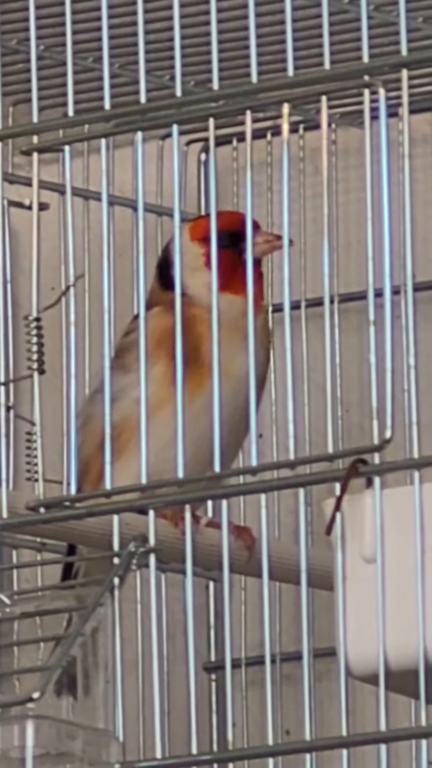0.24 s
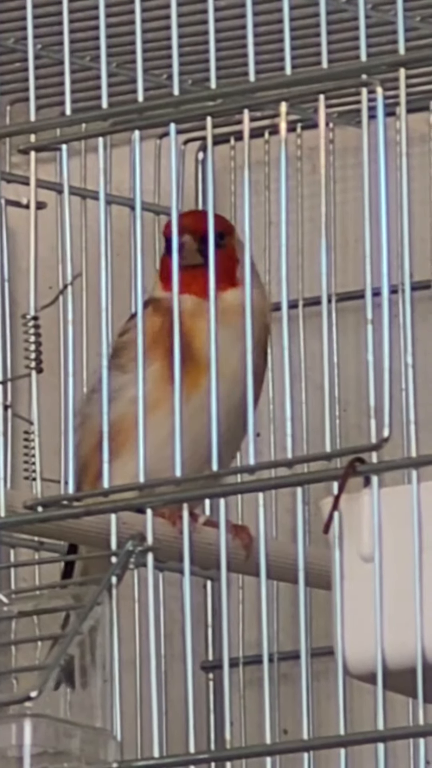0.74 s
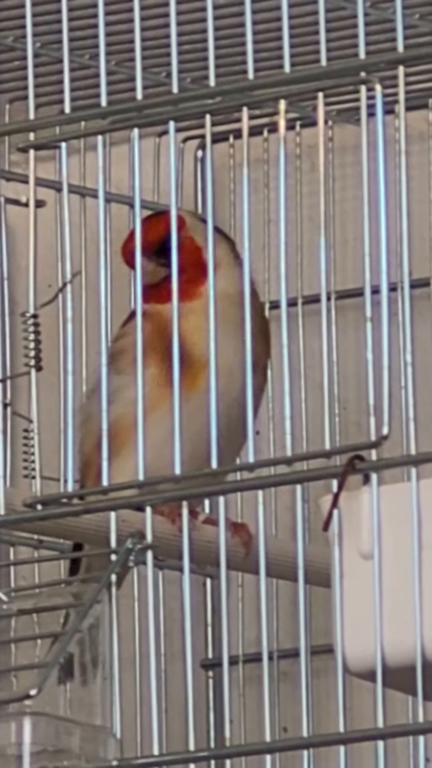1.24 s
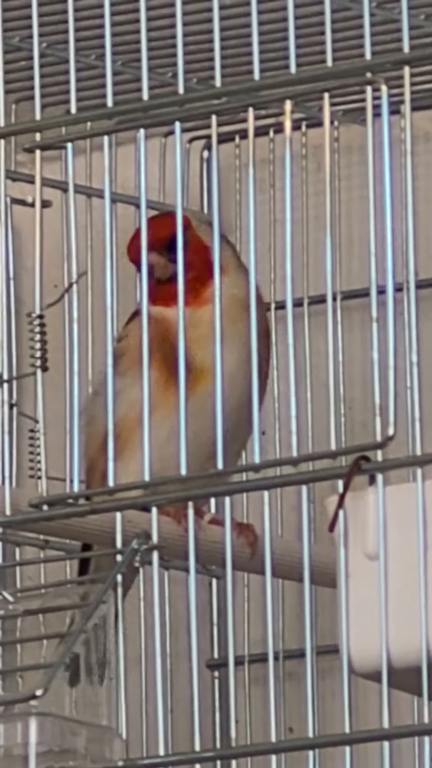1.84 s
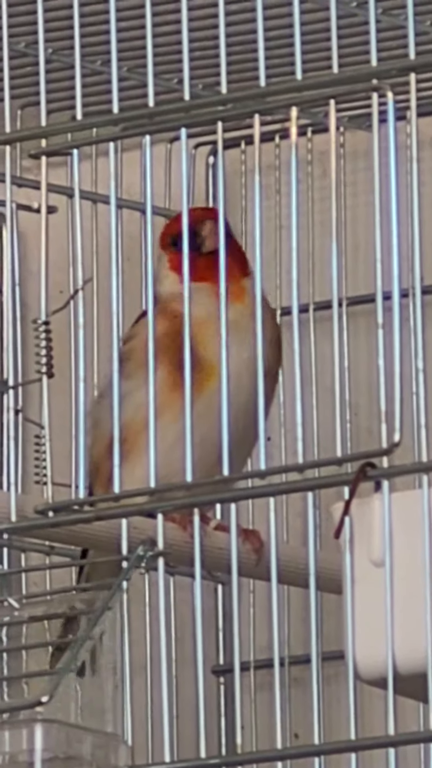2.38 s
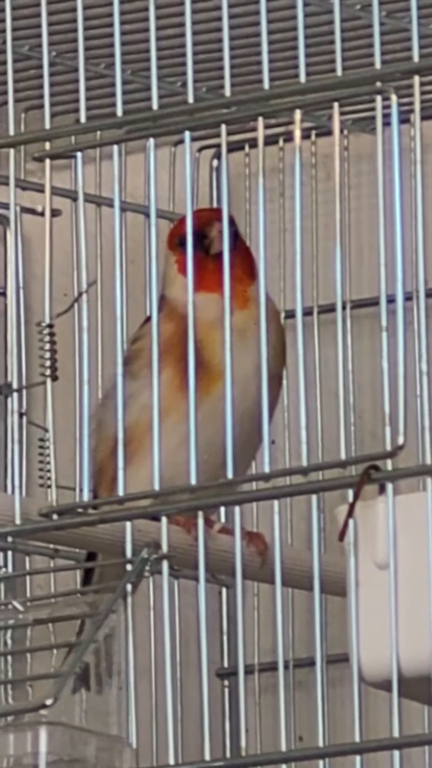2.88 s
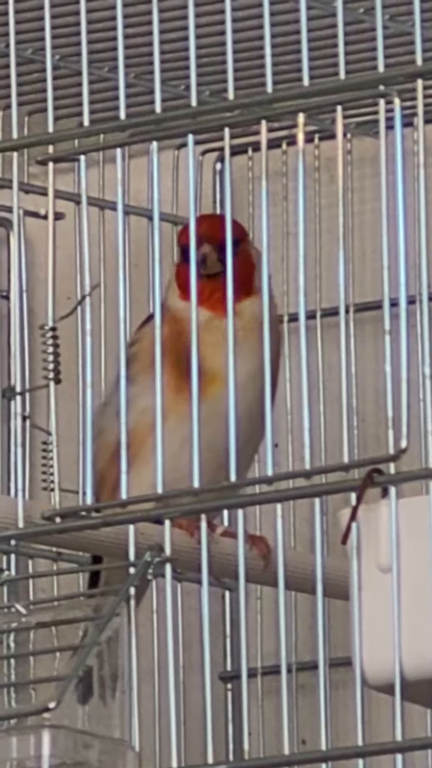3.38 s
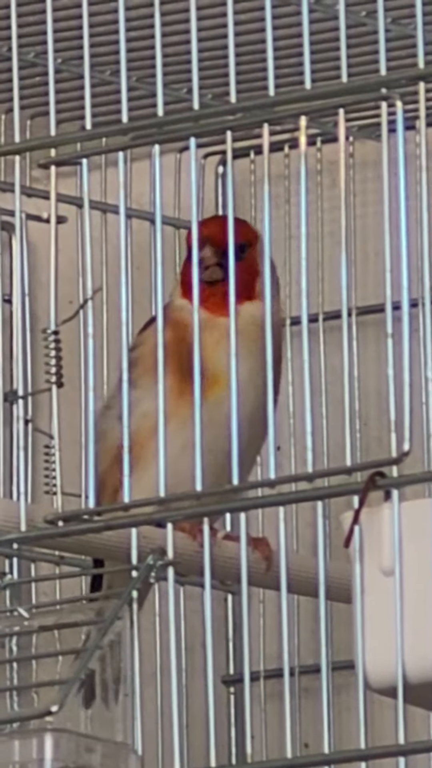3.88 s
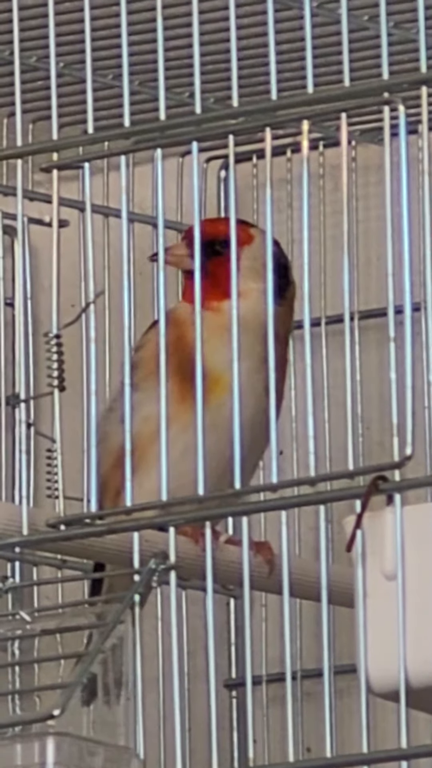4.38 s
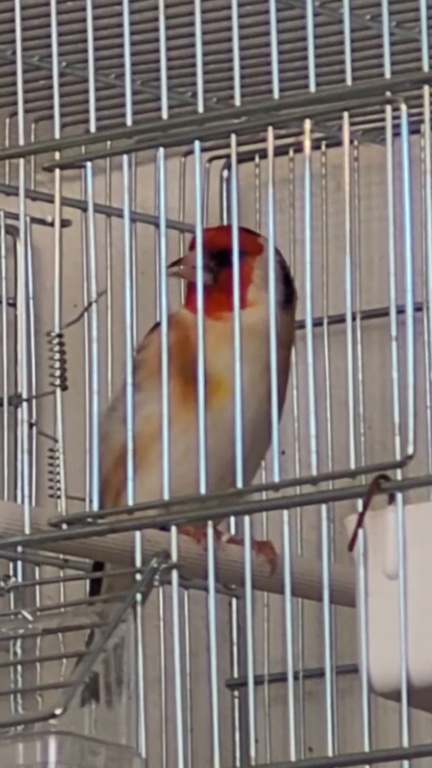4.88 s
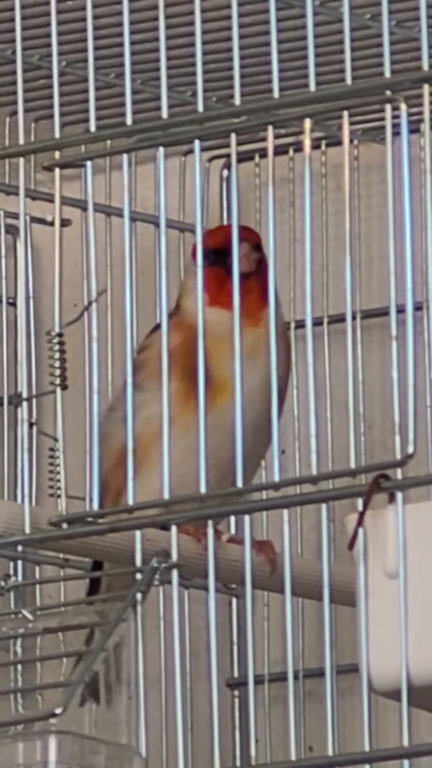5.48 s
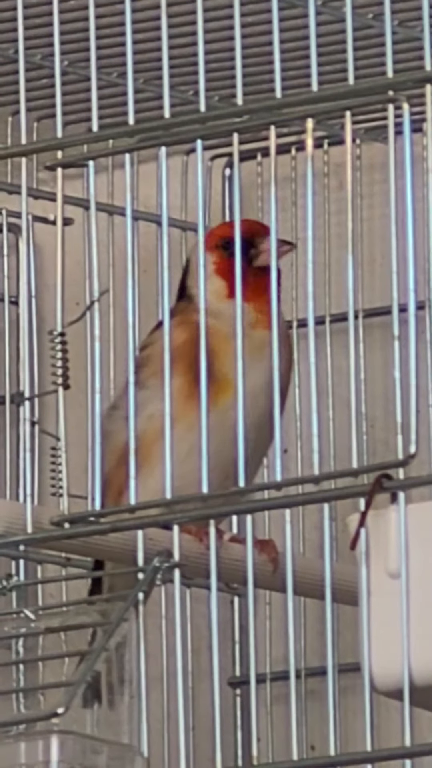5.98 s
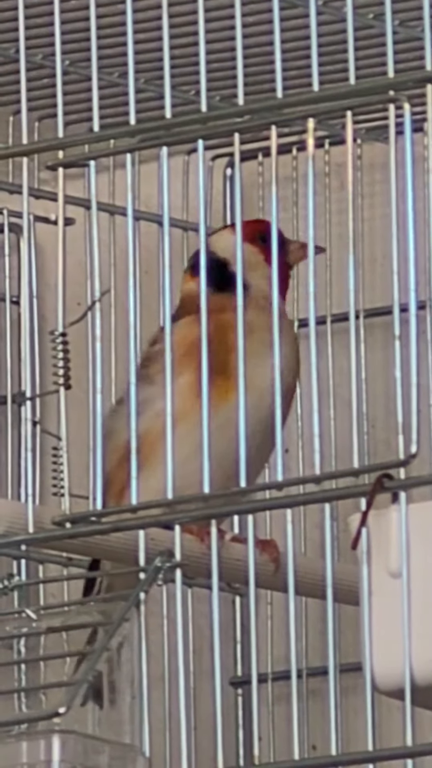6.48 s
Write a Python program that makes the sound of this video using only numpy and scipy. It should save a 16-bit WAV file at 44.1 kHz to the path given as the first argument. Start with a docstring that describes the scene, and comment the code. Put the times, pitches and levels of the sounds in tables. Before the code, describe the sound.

A caged finch sings in a small, reflective room, heard from a short distance by a phone, slightly to the right. A harsh falling buzz opens at 0 s, then a fast ticking run from 0.2 to 0.45 and a few thin chirps. A near-pause around 0.7-1.0 holds soft dull rustles and bumps. From 1.05 to 2.1 come nasal slurs gliding up and down, quick pips and chups, with faint farther twitter. Low upward notes repeat at 2.45-2.85, then a sharp peep and an accelerating bell-like trill to about 3.45, with a downward slur inside. Five rising whits follow at 3.5-3.9, clicks and a dense buzz at 4.0-4.35, then loud descending whistles at 4.5-5.1. A falling slur at 5.3 leads to tumbling chirps at 5.65-6.3, a bright whistle at 6.0, and last upward flicks and a tiny buzz near 6.7. Quiet uneven rumble sinks in the gaps.

```python
"""Finches in a hard-walled room

Caged finches twitter in a small room, some way from a phone, over soft farther chatter, rustles, thumps and rumble.
Whistles, trills and slurs are fluttering sines with overtones and breath; buzzes are fast falling chirps.
Rustles are decaying noise puffs and the rumble is coloured noise in uneven patches.
Decaying noise echoes smear the birds and rustles, and a noise suppressor turns faint sound down.
"""
import sys
import numpy as np
from scipy import signal
from scipy.fft import rfft, irfft, next_fast_len
from scipy.io import wavfile
from scipy.ndimage import uniform_filter1d

SR = 44100
rng = np.random.default_rng(int(sys.argv[2]) if len(sys.argv) > 2 else 0)


def put_to_file(sound):
    """Save the sound as 16-bit audio at rate SR, in the file named by the first command-line argument."""
    columns = np.atleast_2d(sound).T  # one column per channel
    safe = np.clip(columns, -1, 1)
    whole_steps = np.round(safe * 32767)
    wavfile.write(sys.argv[1], SR, whole_steps.astype(np.int16))


N = 296781

# All levels are relative: the filters and gains further on change them.
# Room rumble spectrum: (frequency [Hz], density [dB])
RUMBLE_SPECTRUM = [(20, -47), (60, 6.5), (110, -6.5), (160, -0.5), (300, -4.5), (760, -14), (2100, -18),
                   (15000, -24)]
# Likeness of the rumble at the two ports: (frequency [Hz], correlation [0 to 1])
PORT_LIKENESS = [(150, 0.94), (380, 0.62), (950, 0.17)]
# Feather and perch puffs: (time [s], level [dB], hiss against body [dB])
RUSTLES = [(0.49, -45.5, -10.5), (0.796, -35.5, -14.5), (0.894, -33, -40), (1.31, -30, -22),
           (2.949, -40.5, -15), (3.588, -37, -35)]
# Soft twitter of farther birds: (start [s], end [s], level [dB])
CHATTER = [(1.079, 1.45, -33.5), (1.779, 2.138, -35)]
# Buzzes of falling chirps:
# (time [s], length [s], first top [Hz], last top [Hz], level [dB], mean rate [chirps/s], mean fall [octaves])
BUZZES = [(0.0, .12, 7400, 6800, -24, 58, 1.6), (4.198, .172, 5300, 4600, -26, 72, 1.05),
          (4.19, .17, 7500, 6700, -33, 72, .55), (6.667, .05, 4600, 4600, -37, 50, 1.3)]
# Long bent notes: (overtone strength [dB], level at MIDDLE_HZ [dB], swell [dB/octave],
# pitch points (time [s], pitch [Hz]))
SLURS = [(8, -34, 13.9, [(1.055, 1171), (1.13, 1730), (1.21, 2920), (1.29, 3140)]),
         (-3.5, -28.5, 18.5, [(1.38, 1725), (1.42, 2830), (1.49, 3458), (1.63, 3471), (1.79, 1774)]),
         (1, -33.5, 7.6, [(1.8, 1562), (1.92, 2902), (1.99, 3008), (2.045, 3575)]),
         (-22, -27, 13.4, [(3.072, 7700), (3.092, 5000), (3.15, 3136), (3.2, 2700), (3.385, 1658)]),
         (-14, -28, 14.3, [(5.266, 8000), (5.287, 4430), (5.36, 2836), (5.45, 2353), (5.53, 2540)]),
         (4.5, -41, 4, [(5.77, 2490), (5.83, 3072), (5.91, 3012)]), (-7, -29.5, 12, [(5.9, 3090),
         (5.95, 3508), (6.03, 3615)])]
# Level whistles: (time [s], length [s], pitch [Hz], level [dB])
HELD_NOTES = [(0.494, 0.023, 3636, -28.5), (1.087, 0.03, 7100, -40.5), (1.335, 0.035, 7230, -41),
              (1.405, 0.057, 5040, -25.5), (1.998, 0.043, 5270, -33), (2.024, 0.062, 7150, -29),
              (2.09, 0.04, 4950, -19.5), (2.327, 0.014, 3517, -28), (2.87, 0.022, 4746, -17.5),
              (4.015, 0.017, 6450, -17), (4.022, 0.014, 5610, -22), (4.154, 0.034, 3550, -34.5),
              (4.165, 0.02, 7240, -41), (4.581, 0.014, 3490, -28.5), (4.789, 0.029, 2926, -27.5),
              (5.033, 0.0068, 3804, -25.5), (5.112, 0.016, 2563, -38.5), (5.212, 0.037, 2270, -39),
              (5.236, 0.013, 3790, -29.5), (5.54, 0.0086, 3280, -31.5), (6.012, 0.066, 4600, -18.5),
              (6.034, 0.03, 5510, -20)]
# Sliding whistles: (time [s], length [s], start [Hz], end [Hz], level [dB])
GLIDES = [(0.341, 0.026, 4200, 5910, -30.5), (0.598, 0.023, 3970, 4990, -30.5),
          (0.619, 0.011, 5670, 6800, -38), (1.09, 0.066, 2764, 4650, -32), (1.283, 0.076, 2907, 3687, -23),
          (1.385, 0.03, 3703, 5136, -23.5), (1.776, 0.054, 3700, 4400, -27.5),
          (1.998, 0.023, 7850, 6280, -33), (2.068, 0.017, 3900, 5030, -26),
          (2.132, 0.028, 7660, 6160, -25.5), (2.729, 0.081, 2830, 3290, -40),
          (2.83, 0.065, 3570, 4350, -30), (2.917, 0.072, 1850, 3855, -26), (4.01, 0.029, 8270, 5500, -24.5),
          (4.636, 0.04, 3180, 4460, -22), (4.67, 0.073, 2597, 3595, -26.5), (5.696, 0.08, 2900, 4500, -27),
          (6.342, 0.031, 4310, 3230, -27.5), (6.377, 0.042, 3840, 6580, -24),
          (6.49, 0.019, 3350, 5680, -22)]
# Syllables by name, as strokes sung in a row: (length [s], start [Hz], pulled toward [Hz], end [Hz])
SYLLABLES = dict( tip=[(.02, 3920, 3420, 2175)], pip=[(0.029, 4560, 4970, 4810)],
             chup=[(0.024, 4100, 4144, 3227)], arch=[(.035, 5750, 6140, 5000)],
             hook=[(.008, 5900, 4850, 4370), (.022, 4197, 4235, 4400)], wup=[(.05, 1768, 2394, 2620)],
             bell=[(.034, 4787, 5080, 4880)], whit=[(.042, 3360, 6280, 7250)],
             swoop=[(.073, 6256, 6000, 3937)], flick=[(.008, 3300, 6750, 7600), (.012, 7710, 8220, 5900)],
             tumble=[(0.014, 7570, 4015, 4090), (.038, 4057, 3520, 1736)])
# Repeated syllables: (name, s: first time [s], count [repeats], gap: first gap [s],
# stretch: each gap over the last [ratio], db: level [dB])
TRILLS = [dict(name="tip", s=.195, count=6, gap=.0438, stretch=1, db=-24),
          dict(name="pip", s=1.143, count=5, gap=0.076, stretch=0.82, db=-29),
          dict(name="wup", s=2.44, count=4, gap=.135, stretch=.925, db=-26.5),
          dict(name="hook", s=2.663, count=3, gap=.064, stretch=1, db=-24),
          dict(name="bell", s=2.924, count=11, gap=0.06, stretch=0.95, db=-23.5)]
# Freely timed syllables by name: (time [s], level [dB])
FREE_SYLLABLES = dict( arch=[(.175, -39.5), (.285, -36.5), (1.6, -39), (2.535, -38), (5.48, -37)],
                  chup=[(1.838, -26), (1.925, -24.5), (1.995, -21.5), (2.068, -21)], whit=[(3.508, -23.5),
                  (3.592, -25.5), (3.68, -25), (3.791, -22.5), (3.882, -24.5)], swoop=[(4.51, -18.5),
                  (4.679, -18), (4.858, -16), (5.062, -21)], tumble=[(5.657, -26), (5.742, -23.5),
                  (5.825, -24), (5.924, -26.5), (6.009, -23), (6.095, -29.5), (6.174, -27.5),
                  (6.254, -25.5)])
# Overall tone colour of the birds: (frequency [Hz], gain [dB])
BIRD_COLOUR = [(1200, 2.5), (2500, 2.5), (5000, 4), (7500, 2.5), (8800, -1), (10800, 12), (15000, 9.5)]
# Decay of the wall echoes: (frequency [Hz], time to fall 60 dB [s], before the early part is boosted)
WALL_DECAY = [(1500, 0.17), (3000, 0.35), (5500, 0.29), (9000, 0.22)]

TOP_HZ = 16000  # band limit of the overtones and of the whole sound
CHATTER_PER_S, CHATTER_HZ, CHATTER_S = 59, (2945, 6270), (0.0078, 0.0247)  # notes/s, start pitch and length ranges
MIDDLE_HZ, LOUDEST_HZ = 3320, 4400  # a slur is strongest at LOUDEST_HZ and thins again above it
THROAT_HZ, THROAT_OCTAVES, THROAT_DB = 6000, .24, 14  # the open beak favours a slur's overtones near this pitch
FULL_HZ, FADE_DB_PER_OCTAVE = 3220, 12.5  # below FULL_HZ a whistle weakens as it sinks
HOOK = 0.046  # a slide is pulled toward a pitch beyond its end by this share of its span, so it moves early
FLICK_LEAD_S, FLICK_DB = .03, -9  # every swoop is led in by a softer flick
SWOOP_LATE = 2.66  # a swoop starts softly and peaks late


def amp(db):
    """Logarithmic level: the amplitude ratio of a level in dB."""
    return 10 ** (np.asarray(db) / 20)


def unit(x):
    """Normalisation: scales a signal to an rms of 1."""
    return x / np.sqrt(np.mean(x ** 2) + 1e-20)


def along(points, hz):
    """Log-frequency interpolation between (frequency [Hz], value) points."""
    f, v = np.transpose(points)
    return np.interp(np.log(hz + 1), np.log(f + 1), v)


def filtered(x, response):
    """Linear filtering: multiplies the spectrum by a response of frequency."""
    m = next_fast_len(N + 8192)
    hz = np.fft.rfftfreq(m, 1 / SR)
    return irfft(rfft(x, m) * response(hz), m)[..., :N]


def add(track, s, x):
    """Superposition: adds x to the track in place, from s seconds on."""
    part = track[round(s * SR):][:len(x)]
    part += x[:len(part)]


def room_tone():
    """Partly coherent noise: rumble in slow uneven patches, most alike at the two ports in the bass."""
    z = signal.stft(rng.standard_normal((2, N)), nperseg=2048)[2]
    patches = rng.standard_normal(z.shape[1:])
    patches = uniform_filter1d(patches, size=4, axis=0)
    patches = uniform_filter1d(patches, size=6, axis=1)
    patch_gain = amp(5.57 * unit(patches))
    pair = signal.istft(z * patch_gain, nperseg=2048)[1][:, :N]

    def mid_side_response(hz):
        angle = np.arccos(np.clip(along(PORT_LIKENESS, hz), 0, 1)) / 2  # splits power to give the likeness
        return amp(along(RUMBLE_SPECTRUM, hz)) * [np.cos(angle), np.sin(angle)]

    mid, side = filtered(pair, mid_side_response)
    ports = unit(np.array([mid + side, mid - side]))
    return amp(-49.0) * ports * amp([[-.9], [.9]])


def rustles():
    """Damped noise bursts: puffs of feathers and perch with a dull body and a thin hiss."""
    body, hiss = np.zeros(N), np.zeros(N)
    t = np.arange(SR // 8) / SR
    for s, db, hiss_db in RUSTLES:
        onset = 1 - np.exp(-t / 0.00027)
        puff = amp(db - 60 * t / 0.57) * onset * rng.standard_normal(len(t))
        add(body, s, puff)
        add(hiss, s, amp(hiss_db) * puff)
    dull = lambda hz: hz / 300 / (1 + (hz / 300) ** 2) / (1 + hz / 2500)
    return amp(15.5) * filtered(body, dull) + amp(12.0) * hiss


def chatter():
    """Random superposition: short soft slides at random moments and pitches."""
    out = np.zeros(N)
    for start, end, db in CHATTER:
        count = round((end - start) * CHATTER_PER_S)
        for when, high, long, bend, size in rng.random((count, 5)):
            length = np.interp(long, [0, 1], CHATTER_S)
            start_hz = np.interp(high, [0, 1], CHATTER_HZ)
            end_hz = start_hz * 2 ** (0.602 * (bend - .5))
            note = stroke(length, start_hz, end_hz, end_hz, db + 8 * (size - .5))
            add(out, start + when * (end - start), note)
    return out


def voice(hz, gain, overtones_db=(-26, -28), rough=1.0, breath_db=-29):
    """Harmonic oscillation of the syrinx: a sine of fluttering pitch and strength, its overtones and breath."""
    samples = np.arange(len(hz))
    step = samples / 150  # a new random flutter value every 150 samples
    waver, shake = [np.interp(step, samples, rng.standard_normal(len(hz))) * rough for _ in range(2)]
    cycles = np.cumsum(hz * (1 + .005 * waver)) / SR
    phase = 2 * np.pi * (cycles + rng.random())
    tone = np.sin(phase)
    for k, db in enumerate(overtones_db, start=2):
        tone = tone + amp(db) * (k * hz < TOP_HZ) * np.sin(k * phase)
    breath = amp(breath_db) * rng.standard_normal(len(hz))
    return gain * (np.sqrt(2) * amp(2.28 * shake) * tone + breath)


def stroke(length, start_hz, pull_hz, end_hz, db, late=0.82):
    """Effort-driven whistle: pitch bends toward pull_hz while the level rises and fades."""
    u = np.linspace(0, 1, max(round(length * SR), 8))
    hz = start_hz ** ((1 - u) ** 2) * pull_hz ** (2 * u * (1 - u)) * end_hz ** (u * u)
    effort = np.sin(np.pi * u ** late).clip(1e-4) ** 0.44
    overtones_db = np.array([[-28], [-28]]) + 40 * np.log10(effort)  # only the strongest part is rich
    low_fade_db = FADE_DB_PER_OCTAVE * np.log2(np.minimum(hz / FULL_HZ, 1))
    return voice(hz, amp(db + low_fade_db) * effort, overtones_db)


def buzzes():
    """Auditory fusion: falling chirps so fast that they merge into a rasp."""
    out = np.zeros(N)
    for s, length, top_hz, last_hz, db, rate, octaves in BUZZES:
        t = np.arange(0, length, 1 / SR)
        pace = (1 + 0.092 * rng.standard_normal(len(t)))[(t * rate).astype(int)].clip(.5)  # uneven
        beat = np.cumsum(rate / SR * pace)
        u = beat % 1  # progress through each chirp
        depth = (1 + 0.1236 * rng.standard_normal(len(t)))[beat.astype(int)]  # each chirp falls its own way
        hz = np.interp(t, [0, length], [top_hz, last_hz]) * 2 ** (-octaves * u * depth)
        pulse = np.sin(np.pi * np.sqrt(u)).clip(0) ** 2.4
        add(out, s, voice(hz, amp(db) * pulse, rough=1.6, breath_db=-41))
    return out


def slurs():
    """Resonant filtering of overtones: long bent notes, the nasal ones rich, more so when sung low."""
    out = np.zeros(N)
    for reed_db, db, swell_db, rows in SLURS:
        s, hz = np.transpose(rows)
        t = np.arange(s[0], s[-1], 1 / SR)
        pitch = uniform_filter1d(np.exp(np.interp(t, s, np.log(hz))), size=600)
        edge = np.minimum(t - s[0], s[-1] - t).clip(0, .02) / .02  # 20 ms ramps
        folded_hz = np.minimum(pitch, LOUDEST_HZ * LOUDEST_HZ / pitch)
        level_db = db + swell_db * np.log2(folded_hz / MIDDLE_HZ)
        low_db = 18 * np.log2(2000 / pitch)
        rough = (1.5 * amp(reed_db)).clip(.25, 2.8)  # a nasal voice is also a grainy one

        def throat(k):
            return THROAT_DB * np.exp(-(np.log2(k * pitch / THROAT_HZ) / THROAT_OCTAVES) ** 2)

        resonance_db = np.array([throat(2.01), throat(2.82) - 5 + low_db, throat(3.7) - 8 + low_db])
        overtones_db = reed_db - 10 + resonance_db
        add(out, s[0], voice(pitch, edge * amp(level_db), overtones_db, rough, breath_db=-26.5))
    return out


def whistles():
    """Frequency modulation of a near-pure tone: single notes, trills and freely timed syllables."""
    out = np.zeros(N)
    for s, length, hz, db in HELD_NOTES:
        add(out, s, stroke(length, hz * .985, hz * 1.01, hz * .99, db))  # a slight arch
    for s, length, start_hz, end_hz, db in GLIDES:
        pull_hz = end_hz * (end_hz / start_hz) ** HOOK
        add(out, s, stroke(length, start_hz, pull_hz, end_hz, db))

    sung = [(name, s, db) for name, rows in FREE_SYLLABLES.items() for s, db in rows]
    sung += [("flick", s - FLICK_LEAD_S, db + FLICK_DB) for s, db in FREE_SYLLABLES["swoop"]]
    for t in TRILLS:
        for k in range(t["count"]):
            delay = t["gap"] * np.sum(t["stretch"] ** np.arange(k))
            sung.append((t["name"], t["s"] + delay, t["db"]))
    for name, s, db in sung:
        key = 1 + 0.00493 * rng.standard_normal()  # no two repeats sit at quite the same pitch
        shape = dict(late=SWOOP_LATE) if name == "swoop" else {}
        strokes = [stroke(n, key * a, key * b, key * c, db, **shape) for n, a, b, c in SYLLABLES[name]]
        add(out, s, np.concatenate(strokes))
    return out


def walls(x, count=24):
    """Reverberation: direct sound and a tail, strong early, longest around 3 kHz and shortest at low pitch.

    The echo pattern differs at each port and drifts: successive random tails cross-fade."""
    out, place = np.zeros((2, N + SR)), np.arange(N) * count / N
    for k in range(count + 1):
        hz, t, z = signal.stft(rng.standard_normal((2, SR // 2)), SR, nperseg=128)
        decay = amp(-60 * t / along(WALL_DECAY, hz)[:, None])
        tail = signal.istft(z * decay, SR, nperseg=128)[1]
        age = np.arange(tail.shape[1]) / SR
        tail = tail * (1 - np.exp(-age / 0.00081)) * (1 + 0.99 * np.exp(-age / 0.037))
        tail /= np.linalg.norm(tail[0])
        tail[[0, 1], rng.integers(0, 24, size=2)] += amp(-2.5)  # direct sound, at a random small delay per port
        near = np.flatnonzero(abs(place - k) < 1)
        part = x[near] * np.cos(np.pi / 2 * (place[near] - k)) ** 2
        heard = signal.fftconvolve(part[None], tail, axes=1)
        out[:, near[0]:near[0] + heard.shape[1]] += heard
    return out[:, :N]


def scene():
    """Level difference between ports: the birds are nearer the right one; rumble lies beneath."""
    birds = whistles() + chatter() + slurs() + buzzes()
    near = filtered(birds, lambda hz: amp(along(BIRD_COLOUR, hz))) + rustles()
    return walls(near) * amp([[-5], [.3]]) + room_tone()


def record(dry):
    """Downward expansion: the phone's noise suppressor turns faint sound down; then its band limit."""
    power = abs(uniform_filter1d(np.mean(dry ** 2, axis=0), size=900))
    level_db = 10 * np.log10(power + 1e-12)
    duck_db = np.clip(0.45 * (level_db + 32.5), -11, 0)
    gain = amp(uniform_filter1d(duck_db, size=400))
    return filtered(dry * gain, lambda hz: hz < TOP_HZ)


dry = scene()
out = record(dry)
put_to_file(out)
```